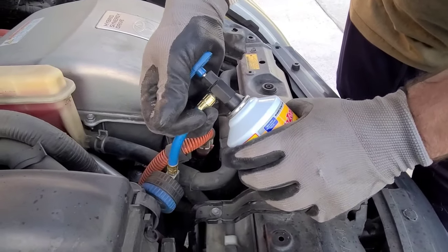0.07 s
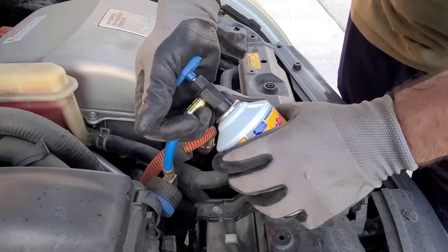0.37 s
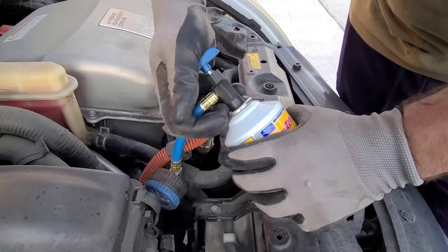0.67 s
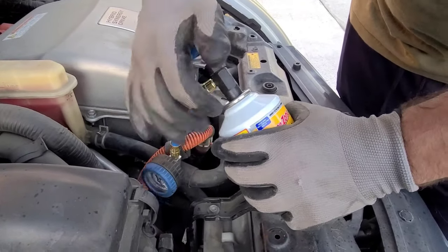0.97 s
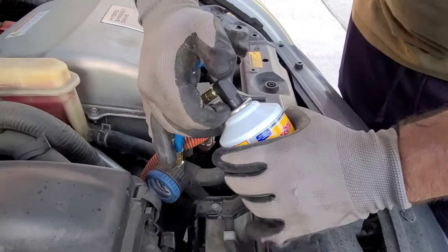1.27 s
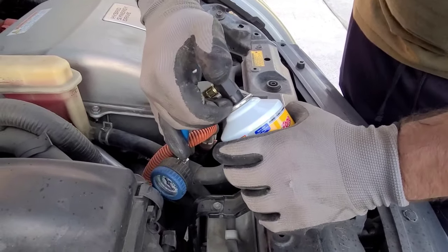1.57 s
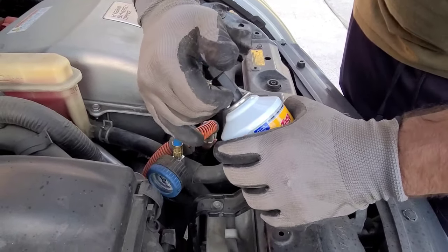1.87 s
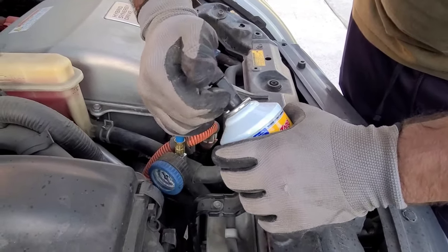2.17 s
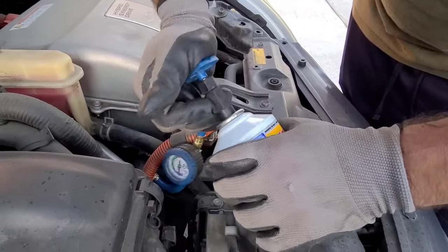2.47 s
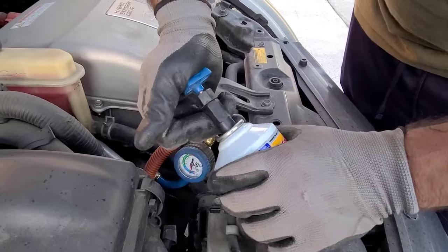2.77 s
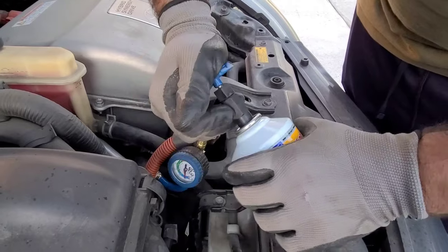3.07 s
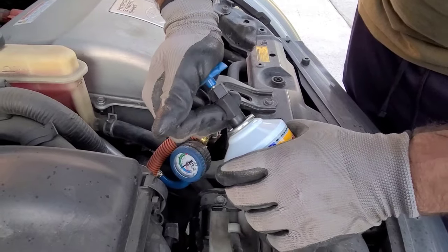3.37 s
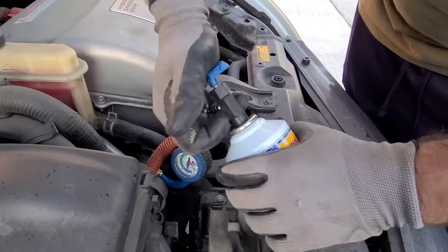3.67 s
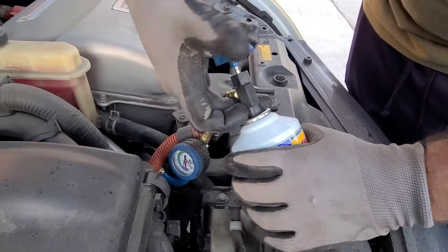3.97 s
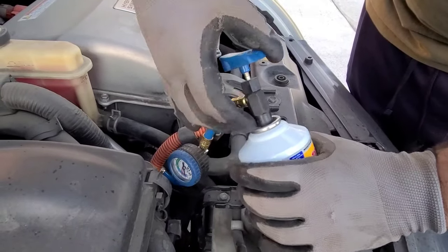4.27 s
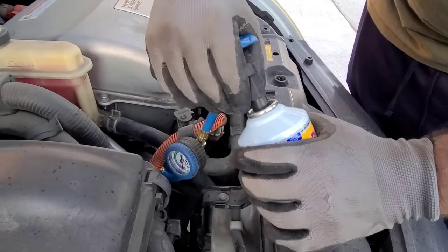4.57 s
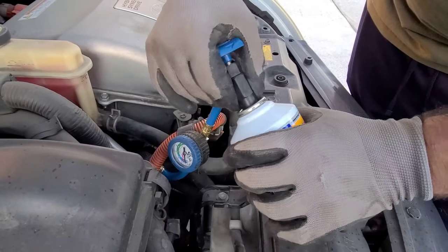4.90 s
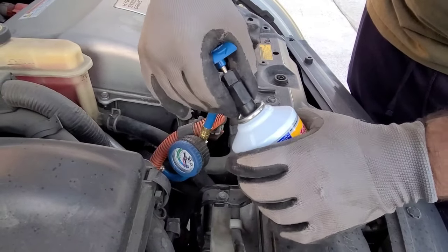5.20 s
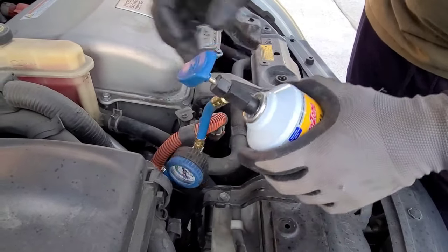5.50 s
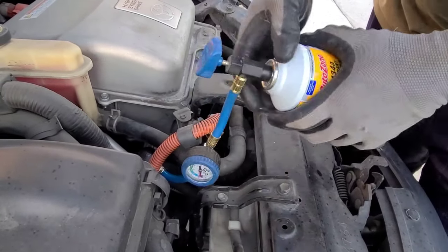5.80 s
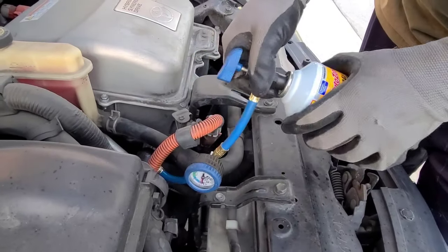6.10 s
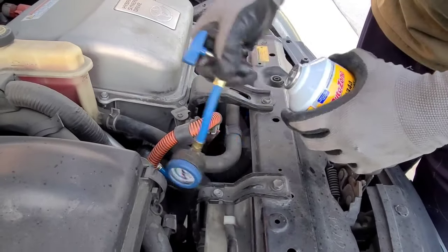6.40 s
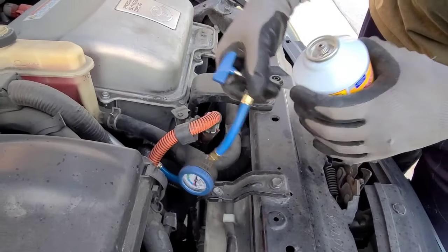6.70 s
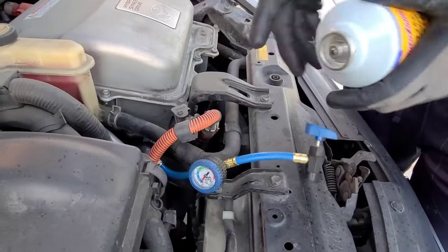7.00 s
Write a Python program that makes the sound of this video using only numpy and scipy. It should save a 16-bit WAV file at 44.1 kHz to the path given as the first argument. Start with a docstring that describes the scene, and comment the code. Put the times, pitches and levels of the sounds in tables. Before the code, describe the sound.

Over a steady engine hum, pressurised gas escapes in whistling bursts, thins to a faint leak, and a metal fitting clatters down.

```python
"""An air-conditioning compressor hums over fan noise in a running engine bay, and a metal tap clicks.
Gloved hands unscrew a refrigerant can from its tap valve, with faint squeaks. As the seal loosens, gas
escapes in hissing, whistling bursts that splutter when liquid comes along, then seeps thinly until the
can comes free with a puff. The fittings click and ring, and the loose tap drops on the front panel."""
import sys
import numpy as np
from scipy import signal
from scipy.fft import rfft, irfft
from scipy.io import wavfile
from scipy.ndimage import map_coordinates

SR = 44100
rng = np.random.default_rng(int(sys.argv[2]) if len(sys.argv) > 2 else 0)


def inscribe(sig):
    """Save sig as 16-bit PCM at rate SR to the path in sys.argv[1].

    A 1-D sig is mono; a 2-D sig holds one channel per row.
    Samples are clipped to [-1, 1] before scaling.
    """
    pcm = np.round(np.clip(np.atleast_2d(sig).T, -1, 1) * 32767)
    wavfile.write(sys.argv[1], SR, pcm.astype(np.int16))


N = 319725
TIME = np.arange(N) / SR
FREQS_HZ = np.fft.rfftfreq(N, 1 / SR)
OPEN_S, SPENT_S, FREE_S = 2.585, 3.78, 6.397  # the seal opens, the pressure is spent, the can comes off
SHAFT_HZ = 105.2  # turns of the compressor's shaft each second

# Tone colours of the bright jet, the ringing gap and the wet splutter: pitch_hz, relative_db
JET_COLOUR = [(5000, -10.5), (8000, -9), (9200, -2), (10000, 5), (11200, 0.5), (12300, 6), (13300, -2.5),
              (14500, -7)]
GAP_COLOUR = [(2000, -10), (3000, -2.5), (3500, -4), (3850, -8), (4200, 0), (4600, -5), (5100, -6),
              (5600, -9), (6400, -3), (8000, -8), (10000, -54)]
SPLUTTER_COLOUR = [(400, -10), (800, -16), (1150, -1), (1600, -4), (2100, -6), (2600, -5), (3300, -12.5),
                   (4500, -14.5)]
# The turning glove retunes the hollows heard in the gap's sound: time_s, shift_percent
GLOVE_TUNING = [(2.619, 1), (2.78, -2.5), (3.049, -1.7), (3.329, -1), (3.5, .5), (3.68, 2), (3.83, -4.5)]


def gas_bursts():
    """Gas forces the loosened seal: a bright jet, a whistling gap, and splutter when liquid comes along."""
    jet_flow, gap_flow, wet_flow = seal_flow()
    jet = gas_noise(JET_COLOUR, flutter_db=0.5, flutter_hz=70, spit_db=-6)
    gap = gas_noise(GAP_COLOUR, flutter_db=2, flutter_hz=60, spit_db=-19)
    gap = retune(gap, GLOVE_TUNING) + amp(-5) * gap_whistle()
    splutter = gas_noise(SPLUTTER_COLOUR, flutter_db=3, flutter_hz=60, spit_db=7)
    return jet_flow * jet + amp(-3.5) * gap_flow * gap + amp(-0.5) * wet_flow * splutter


# Spurts of gas: start_s, rise_s, hold_s, shut_s, jet_db, gap_offset_db, wet_offset_db, whistle_hz
SPURTS = [(2.608, 0.04, 0.037, .016, -34.5, -1.5, -7, 4950),
          (2.692, 0.063, 0.06, .05, -33.5, -4.5, -10, 4270), (2.902, .008, .006, .025, -42, -8, -3, 4250),
          (2.972, .011, 0.07, .06, -26, -1.5, -12, 4230), (3.055, 0.036, 0.048, .075, -28, 0.5, -11, 4450),
          (3.27, .045, .035, .04, -34, -2, -8, 4500), (3.317, .02, 0.014, .016, -38, 14, -4, 4470),
          (3.375, .035, .1, .04, -42, 7.5, -2, 4540), (3.51, 0.03, 0.15, .06, -31, 0, -5, 4580),
          (3.6, .035, .04, .05, -35, -2, -3, 4850), (3.688, 0.012, 0.016, .03, -35, 9, -6, 4800),
          (3.735, .02, .02, .04, -34, 5.5, -7, 4620), (3.765, .015, .015, .04, -40, 6, -7, 4350)]
# Gulps of liquid coming through the seal: middle_s, length_s, level_db
GULPS = [(2.996, 0.06, -31), (3.095, 0.063, -28.5), (3.144, 0.053, -31), (3.314, .03, -41),
         (3.34, .035, -41), (3.52, 0.039, -31), (3.549, 0.039, -28.5), (3.623, 0.06, -30),
         (3.671, 0.057, -25.5), (3.706, 0.045, -26.5), (3.748, 0.037, -34)]


def seal_flow(opening_db_per_s=19, sag_db_per_s=2):
    """How strong the jet, gap and splutter are: a widening leak, spurts and gulps add up in power."""
    widening_db = -51 + opening_db_per_s * (np.minimum(TIME, SPENT_S) - OPEN_S)
    leak = envelope(OPEN_S, 0.017, SPENT_S) * amp(widening_db)
    power = np.outer(amp([0, 0, -4.5]), leak) ** 2  # rows: jet, gap, splutter
    for start_s, rise_s, hold_s, shut_s, jet_db, gap_offset_db, wet_offset_db, _ in SPURTS:
        peak_s = start_s + rise_s
        sag_db = sag_db_per_s * np.maximum(TIME - peak_s, 0)
        spurt = envelope(start_s, rise_s, peak_s + hold_s, shut_s) * amp(jet_db - sag_db)
        power += np.outer(amp([0, gap_offset_db, wet_offset_db]), spurt) ** 2
    for middle_s, length_s, level_db in GULPS:
        gulp = np.cos(np.pi * np.clip((TIME - middle_s) / length_s, -0.5, 0.5))
        power[2] += (amp(level_db) * gulp) ** 2
    return np.sqrt(power)


def gap_whistle():
    """The gap's breathy whistle holds its pitch early in each spurt, then glides to the next."""
    held_pitches = [(time_s, hz) for start_s, rise_s, hold_s, *_, hz in SPURTS
                    for time_s in (start_s + rise_s / 2, start_s + rise_s + hold_s / 3)]
    breath = gas_noise(GAP_COLOUR, flutter_db=0.5, flutter_hz=60, spit_db=3)
    whistle = resonate(breath, over_time(held_pitches), width_hz=260)
    return whistle / np.std(whistle.mean(0))


# Tone colour of the thin leak: pitch_hz, relative_db
SEEP_COLOUR = [(2500, -25), (4200, -9.5), (4950, -0.5), (5400, -9), (5900, 3), (6700, -11), (8500, 0.5),
               (11000, -3), (12200, 6.5), (14300, -2)]


def gas_seep(bubbles_per_s=70, spread_db=3.5, growth_db_per_s=1.66):
    """Before and after the bursts, gas bubbles along the oily thread in a quick, nearly even sputter."""
    bubble_count = np.cumsum(bubbles_per_s * (1 + 0.025 * wander(9))) / SR
    bubble_size = amp(spread_db * rng.standard_normal(N))[bubble_count.astype(int)]
    sputter = unit(1 + 1.25 * bubble_size * np.sin(np.pi * bubble_count) ** 4)
    first_weep = envelope(2.34, 0.19, OPEN_S) * amp(-52)
    leak = envelope(SPENT_S, 0.045, FREE_S) * amp(-52 + growth_db_per_s * (TIME - SPENT_S))
    last_puff = envelope(FREE_S - 0.019, 0.019, FREE_S) * amp(-42.5)
    hiss = gas_noise(SEEP_COLOUR, flutter_db=1.2, flutter_hz=90, spit_db=2, spits_per_s=760)
    return (first_weep + np.hypot(leak, last_puff)) * sputter * hiss


# Ringing hollows between valve, can and glove: pitch_hz, width_hz, boost_db
HOLLOWS = [(2750, 200, 2), (3260, 130, 9), (3580, 260, 6.5), (3990, 60, 6.5), (4240, 130, 6.5),
           (4570, 170, 11.5), (4930, 120, 8), (5120, 88, 10.5), (5520, 140, 12.5), (9900, 300, -6.5),
           (11100, 400, 4), (12400, 200, -8), (13080, 200, -2), (14270, 310, 3.5)]
# How alike the gas sounds left and right (1 is identical): pitch_hz, likeness
GAS_LIKENESS = [(1500, .62), (3000, .42), (3800, .5), (4600, .82), (5300, .74), (6000, .42), (7500, .25),
                (13000, .18)]


def gas_noise(colour, flutter_db, flutter_hz, spit_db, spits_per_s=700, right_lag_s=0.00018):
    """Rushing gas, off to the left, flutters and spits droplets; the hollows around the valve colour it."""
    spits = (rng.random(N) < spits_per_s / SR) * np.minimum(rng.exponential(1, N), 3)
    strength = amp(flutter_db * wander(flutter_hz)) * (1 + amp(spit_db) * spits)
    jet = stereo_noise(colour, GAS_LIKENESS, strength, 2 * np.pi * FREQS_HZ * right_lag_s)
    boost_db = sum(db / (1 + (2 * (FREQS_HZ - hz) / width_hz) ** 2) for hz, width_hz, db in HOLLOWS)
    jet = irfft(rfft(jet) * amp(boost_db), N)
    return jet / np.std(jet.mean(0))


# The notes each object rings with: pitch_hz, relative_db, ring_s (time to fade by 60 dB)
RINGS = { "tap": [(915, 13, 0.0076), (1640, -0.5, 0.033), (2040, 1.5, 0.014), (2790, -11, 0.03),
         (2840, -6, 0.045), (3750, 2, 0.018), (4250, -1.5, 0.014), (4690, -3.5, 0.017), (5400, -8, 0.017),
         (5850, -7.5, 0.021), (12200, -15, .012)], "can": [(3160, 6.5, 0.03), (4210, 4.5, 0.034),
         (4615, -3, 0.025), (5700, -13, 0.02), (6350, -19, .02), (8950, -22, .012)],
         "valve": [(1520, -3, 0.011), (1695, -3, 0.06), (1785, 0, 0.05), (1925, -2, 0.022),
         (2305, -24, 0.05), (2746, -24, 0.06), (2972, -24, 0.08), (4200, -32, 0.044)],
         "panel": [(564, -8, 0.12), (750, -12, .06), (940, -5, 0.024), (1001, -2, 0.07), (1076, -4.5, 0.1),
         (1265, -6, 0.06)], "hose": [(321, 5, 0.1), (643, 2, .06), (1130, -10, 0.091), (1590, 0.5, 0.067),
         (1900, -6, 0.085), (2200, -4, 0.02), (2910, -12, 0.049)], }
# How long a blow takes to build up on each object: contact_s
CONTACT_S = {"tap": 0.00028, "can": .0009, "valve": 0.00042, "panel": .0008, "hose": 0.00059}
# Blows: start_s, level_db, left_minus_right_db, crack_offset_db, echo_offset_db, object_name
KNOCKS = [(0.09, -14.5, 6.5, -17, -4, "tap"), (0.0923, -30, 14, 2, -6, "tap"),
          (4.062, -44, 4, -16, -9, "hose"), (4.088, -30.5, 2, -22, -5, "hose"),
          (4.3243, -17, -5, -36, -6, "hose"), (4.3314, -27, 1, -25, -5, "valve"),
          (4.334, -22.5, 0, -30, -5, "panel"), (6.4995, -23, 11, -16, -11, "can"),
          (6.5025, -28.5, 18, -14, -11, "can"), (7.1069, -4.5, -1, -33, -9, "valve"),
          (7.1096, -11, -4, -31, -10, "panel"), (7.1156, -15, 6, -29, -7, "panel"),
          (7.1211, -20, 4, -23, -7, "valve"), (7.1216, -25, 3, -29, -8, "panel"),
          (7.135, -22, -2, -32, -10, "panel"), (7.217, -32.5, 9, -5, 0, "tap")]


def knocks(crack_s=0.00069, echo_s=0.084, samples=8000):
    """Each blow makes a sharp crack and rings its object; the crowded bay scatters the sound back."""
    out, t = np.zeros((2, N)), np.arange(samples) / SR
    for start_s, level_db, pan_db, crack_offset_db, echo_offset_db, object_name in KNOCKS:
        ring = sum(amp(db - 60 * t / ring_s) * np.sin(2 * np.pi * hz * t)
                   for hz, db, ring_s in RINGS[object_name])
        ring *= 1 - np.exp(-(t / CONTACT_S[object_name]) ** 2)
        crack = amp(crack_offset_db) * rng.standard_normal(samples) * np.exp(-t / crack_s)
        blow = ring / abs(ring).max() + crack
        scatter = rng.standard_normal((2, samples)) * amp(-60 * t / echo_s) * (t > 0.002)
        scatter /= np.linalg.norm(scatter, axis=1, keepdims=True)
        echo = signal.fftconvolve(blow[None], scatter, axes=1)[:, :samples]
        add(out, start_s, amp(level_db) * pan(pan_db) * (blow + amp(echo_offset_db) * echo))
    return out


# Faint squeaks: start_s, length_s, start_hz, end_hz, level_db
SQUEAKS = [(1.396, 0.063, 696, 690, -40), (1.508, 0.13, 722, 784, -35), (1.59, 0.096, 668, 723, -35.5),
           (1.694, 0.1, 728, 740, -36), (1.99, 0.083, 798, 817, -36.5), (2.05, 0.037, 810, 720, -34),
           (3.978, 0.084, 724, 696, -36), (6.093, 0.067, 680, 706, -38)]


def squeaks():
    """Soft, short gliding tones, perhaps rubber gloves slipping on the can."""
    out = np.zeros((2, N))
    for start_s, length_s, start_hz, end_hz, level_db in SQUEAKS:
        pitch_hz = np.linspace(start_hz, end_hz, round(length_s * SR))
        tone = np.sin(2 * np.pi * np.cumsum(pitch_hz) / SR) * np.hanning(len(pitch_hz))
        add(out, start_s, amp(level_db) * pan(0) * np.sqrt(2) * tone)
    return out


# The hum's harmonics (tones at 1, 2, 3... times the shaft speed): left_db, right_db, left_lead_rad
HARMONICS = [(-45, -43, 0.1), (-56, -61, -0.2), (-46, -40, 1.3), (-39, -40, 0.8), (-41, -40, 1.5),
             (-39, -39, 1.1), (-50, -46, 1.0), (-44, -34, 0.2), (-49, -44, 0.3), (-46, -39, 1.2),
             (-53, -55, -0.1), (-47, -47, -2.3), (-54, -57, 0.3), (-48, -50, 2.7), (-51, -57, -2.2),
             (-65, -54, 2.2), (-52, -52, 1.1), (-45, -48, 0.8), (-61, -55, 1.2), (-49, -58, -0.1),
             (-54, -56, -2.4), (-57, -58, 1.8), (-60, -66, 2.3), (-53, -55, -0.7), (-53, -64, 0.4),
             (-59, -57, 1.0), (-52, -63, -0.4), (-66, -69, 0.5), (-60, -71, -0.5), (-60, -67, -2.9),
             (-64, -65, -1.5), (-61, -73, -0.8)]
# How the pumping tone swells and sinks: time_s, relative_db
PUMP_SWELL = [(0, -1), (.7, -2.5), (1.3, -4.5), (2.7, -2), (3.45, -6), (3.8, -9), (4.25, -1.5), (4.9, 1.5),
              (5.55, 1), (6, -1), (7.25, 2.5)]
# Harmonics that follow that swell (a negative share goes against it): harmonic_number, share
SWELL_SHARES = {2: 0.68, 4: 0.29, 5: -0.63, 6: 0.67, 8: 1, 10: 0.78}
# One harmonic drifts sideways as the hands move: time_s, extra_left_minus_right_db
SIDE_DRIFT = [(0, 5), (1.5, 5), (2.7, -1.5), (3.8, 13.5), (4.7, 3), (5.7, -1), (6.5, -4), (7.25, -7)]


def compressor(trim_db=-0.6, waver_db=1.24, flutter=0.18, smear_rad=0.24, drifting_harmonic=6):
    """Pump strokes on a steady shaft make a hum; its strongest tones swell together and each one wavers."""
    shaft_angle = 2 * np.pi * np.cumsum(SHAFT_HZ + 0.0323 * wander(0.62)) / SR + 0.021 * wander(3.7)
    pump_db, drift_db = over_time(PUMP_SWELL), over_time(SIDE_DRIFT)
    pump_db -= pump_db.mean()
    out = np.zeros((2, N))
    for number, (left_db, right_db, lead_rad) in enumerate(HARMONICS, 1):
        swell = amp(waver_db * wander(0.41) + pump_db * SWELL_SHARES.get(number, 0))
        swell *= 1 + flutter * wander(18)
        phase = number * (shaft_angle + smear_rad * rng.standard_normal())  # smears high tones most
        tone = np.array([amp(left_db) * np.sin(phase + lead_rad), amp(right_db) * np.sin(phase)])
        out += swell * tone * pan(drift_db if number == drifting_harmonic else 0)
    return np.sqrt(2) * amp(trim_db) * out


# Tone colours of the bay's rumble and fan: pitch_hz, relative_db
RUMBLE_COLOUR = [(15, -78.5), (30, -66), (50, -54.5), (72, -51.5), (110, -57), (170, -57), (230, -65.5),
                 (400, -102.5)]
FAN_COLOUR = [(150, -81), (260, -65.5), (380, -59.5), (480, -65), (600, -68), (770, -62), (900, -69),
              (1100, -71.5), (1400, -75), (1950, -74.5), (2400, -81), (3250, -85), (3700, -89.5),
              (5400, -102), (6500, -116)]
# How the rumble swells and sinks: time_s, relative_db
RUMBLE_SWELL = [(0, 1.5), (.4, 2.5), (.65, -2), (.9, -5), (1.35, -12), (1.65, -1), (2.02, -9.5),
                (2.2, -1.5), (2.62, 2), (3.2, -1), (3.93, -2.5), (4.02, 2.5), (4.13, -0.5), (5.5, -0.5),
                (5.9, 1.5), (7.25, 2)]
# How alike the background noise is left and right (1 is identical): pitch_hz, likeness
BACKGROUND_LIKENESS = [(30, 0.48), (70, 0.86), (130, 0.96), (400, 0.56), (800, 0.61), (1500, 0.0034),
                       (4000, 0.049)]
# How far the fan's sound on the left runs ahead of the right: pitch_hz, left_lead_rad
FAN_LEAD = [(280, 0.11), (420, 0.79), (490, 2.44), (600, 1.25), (850, 0.56), (950, 1.5), (1150, 2),
            (1300, 3.25)]


def engine_bay(throb_depth=0.15, gust_db=2.07, fan_share=0.22):
    """A low rumble, and fan noise that throbs with the shaft and partly follows the rumble's level."""
    swell_db = over_time(RUMBLE_SWELL)
    throb = (1 + throb_depth * np.sin(2 * np.pi * SHAFT_HZ * TIME)) * amp(gust_db * wander(13))
    rumble = stereo_noise(RUMBLE_COLOUR, BACKGROUND_LIKENESS)
    fan = stereo_noise(FAN_COLOUR, BACKGROUND_LIKENESS, throb, over_pitch(FAN_LEAD))
    return amp(swell_db - 1.5) * rumble + amp(fan_share * swell_db - 0.28) * fan


# Weak machinery tones, including the compressor's thin high whine: pitch_hz, level_db, left_minus_right_db
MACHINERY_TONES = [(75.6, -54.5, -3), (144.7, -52, 3.5), (165.2, -48, -0.5), (957, -48, -3),
                   (3797, -67, 2.5), (3915, -68, 6), (9090, -74.5, 19.5), (9600, -74, 2.5),
                   (10340, -73, 9.5), (10940, -73, 17.5), (11700, -73.5, 16.5)]


def machinery_tones(waver_db=2.2, drift_hz=1.0, right_lag_s=0.000291):
    """Weak tones come and go; the high ones come through louder once the can is lifted away."""
    out = np.zeros((2, N))
    uncovered_db = 1.5 * np.clip((TIME - FREE_S) / 0.2, 0, 1)
    for pitch_hz, level_db, pan_db in MACHINERY_TONES:
        cycles = np.cumsum(pitch_hz + drift_hz * wander(3.5)) / SR
        tone = np.sin(2 * np.pi * np.array([cycles + pitch_hz * right_lag_s, cycles]))
        gain = amp(level_db + waver_db * wander(2.2) + uncovered_db * (pitch_hz > 3000))
        out += gain * pan(pan_db) * tone
    return np.sqrt(2) * out


# Tone colour of the microphone's hiss: pitch_hz, relative_db
MICROPHONE_HISS_COLOUR = [(2000, -110), (4500, -99), (5400, -102), (6400, -120), (8200, -118), (9300, -99),
                          (11500, -100), (14300, -101)]


def microphone_hiss():
    """The microphone's own faint, steady hiss, behind the bay's rumble and fan."""
    return stereo_noise(MICROPHONE_HISS_COLOUR, BACKGROUND_LIKENESS)


# The left side hears more treble: pitch_hz, left_minus_right_db
LEFT_TREBLE = [(100, 0.5), (700, 0), (1800, 1), (2600, 2.5), (4400, 10), (8000, 7.5), (11500, 9),
               (12500, 19), (13300, 30)]


def stereo_noise(colour, likeness, strength=1, left_lead_rad=0):
    """Left and right noise, partly alike, shaped first in strength and then in tone colour."""
    left, separate = rfft(rng.standard_normal((2, N)) * strength)
    shared = np.clip(over_pitch(likeness), -1, 1)
    right = (shared * left + np.sqrt(1 - shared ** 2) * separate) * np.exp(-1j * left_lead_rad)
    treble_fade = 1 / (1 + (FREQS_HZ / (2 * colour[-1][0])) ** 4)
    gain = pan(over_pitch(LEFT_TREBLE)) * amp(over_pitch(colour)) * treble_fade
    return irfft(np.array([left, right]) * gain, N) * np.sqrt(SR / 2)


def envelope(start_s, rise_s, end_s, shut_s=0.069):
    """Gas flow that rises, holds, and is pinched off as the gap shuts."""
    rise = np.clip((TIME - start_s) / rise_s, 0, 1)
    return rise * np.clip(1 - (TIME - end_s) / shut_s, 0, 1) ** 1.7


def resonate(sound, pitch_hz, width_hz):
    """Keeps a narrow band around a moving pitch: shift it down to zero, smooth, shift back."""
    spin = np.exp(2j * np.pi * np.cumsum(pitch_hz) / SR)
    decay = np.exp(-np.pi * width_hz / SR)
    return 2 * (spin * signal.lfilter([1 - decay], [1, -decay], sound / spin)).real


def retune(sound, percent_curve):
    """Slides a stereo noise up or down in pitch by playing it faster or slower."""
    position = np.cumsum(1 + over_time(percent_curve) / 100)
    return np.array([map_coordinates(side, [position], order=3, mode="mirror") for side in sound])


def wander(rate_hz, points=2048):
    """A smooth random wobble of typical size 1, mostly slower than rate_hz."""
    hz = np.fft.rfftfreq(points, N / SR / points)
    slow = irfft(rfft(rng.standard_normal(points)) / (1 + (hz / rate_hz) ** 2))
    return np.interp(TIME, np.linspace(0, N / SR, points), unit(slow - slow.mean()))


def over_pitch(points):
    """Joins (pitch_hz, value) points into a curve along a logarithmic pitch scale."""
    pitch_hz, value = np.transpose(points)
    return np.interp(np.log(FREQS_HZ + 1), np.log(pitch_hz + 1), value)


def over_time(points):
    """Joins (time_s, value) points into a curve with a value at every sample."""
    return np.interp(TIME, *np.transpose(points))


def amp(db):
    """Turns decibels into a gain to multiply by."""
    return 10 ** (np.asarray(db) / 20)


def unit(sound):
    """Scales a signal to an average (rms) size of 1."""
    return sound / np.sqrt(np.mean(sound ** 2) + 1e-20)


def pan(db):
    """Left and right gains that make the left louder by db."""
    return amp(np.array([np.atleast_1d(db), -np.atleast_1d(db)]) / 2)


def add(mix, start_s, sound):
    """Mixes a stereo sound in at start_s."""
    part = mix[:, round(start_s * SR):][:, :sound.shape[1]]
    part += sound[:, :part.shape[1]]


def scene():
    """Escaping gas, knocks and squeaks over the running machinery and faint microphone hiss."""
    background = compressor() + machinery_tones() + engine_bay() + microphone_hiss()
    return gas_bursts() + gas_seep() + knocks() + squeaks() + background


def record(dry):
    """The microphone has a deep dip in the treble, and the very highest sounds are cut off."""
    dip_hz, dip_half_width_hz, dip_db, cutoff_hz = 7347, 614, -22.5, 14570
    dip = amp(dip_db * np.exp(-((FREQS_HZ - dip_hz) / dip_half_width_hz) ** 4))
    coloured = irfft(rfft(dry) * dip, N)
    lowpass = signal.firwin(1023, cutoff_hz, window=("kaiser", 9), fs=SR)
    return signal.oaconvolve(coloured, lowpass[None], "same")


dry = scene()
out = record(dry)
inscribe(out)
```